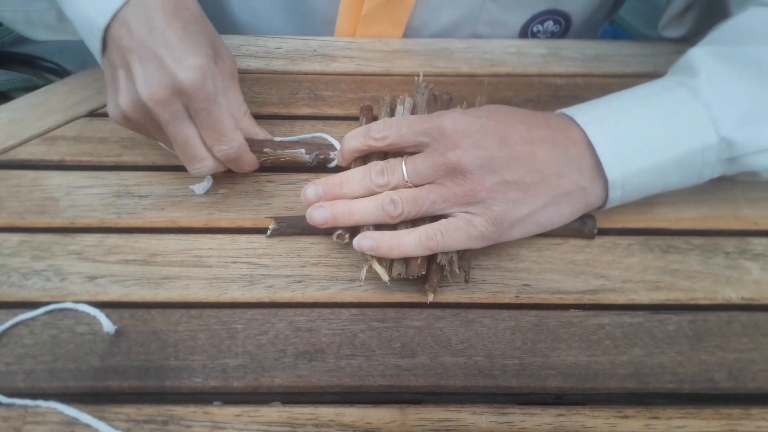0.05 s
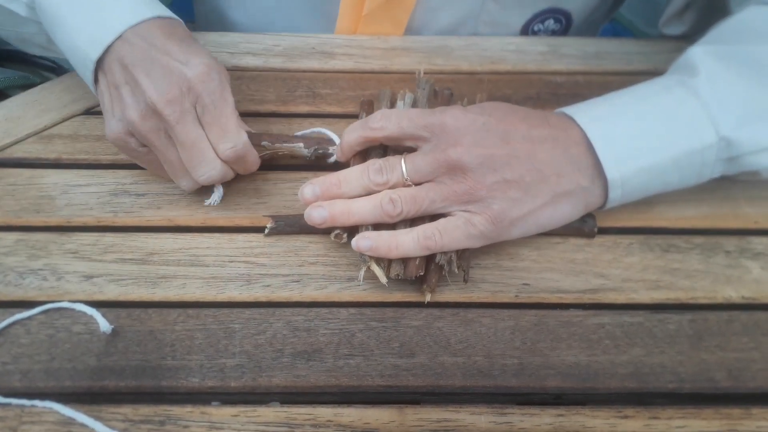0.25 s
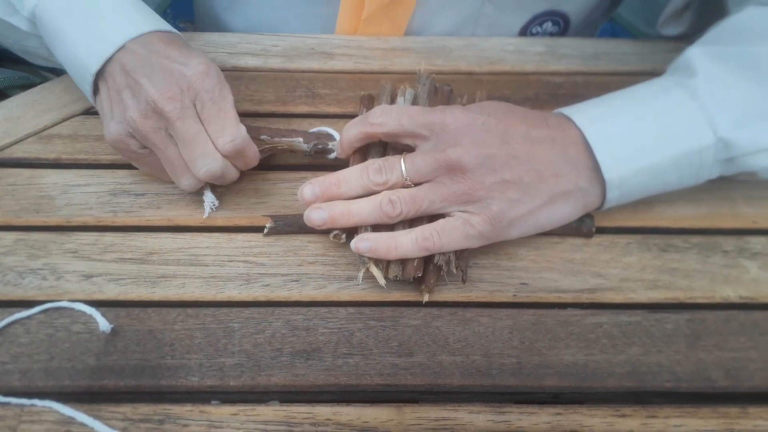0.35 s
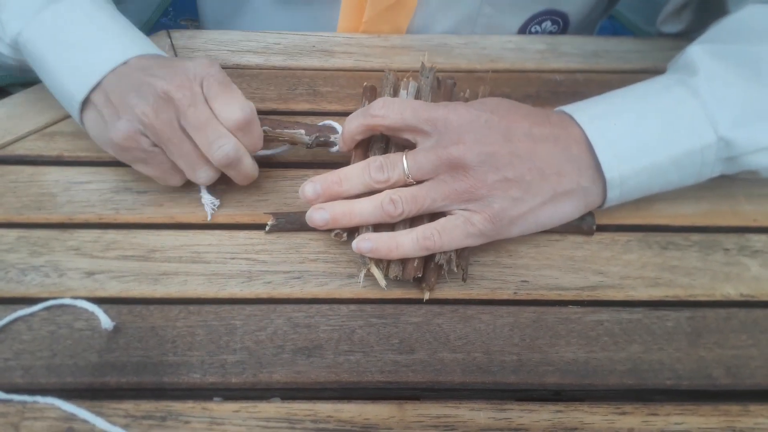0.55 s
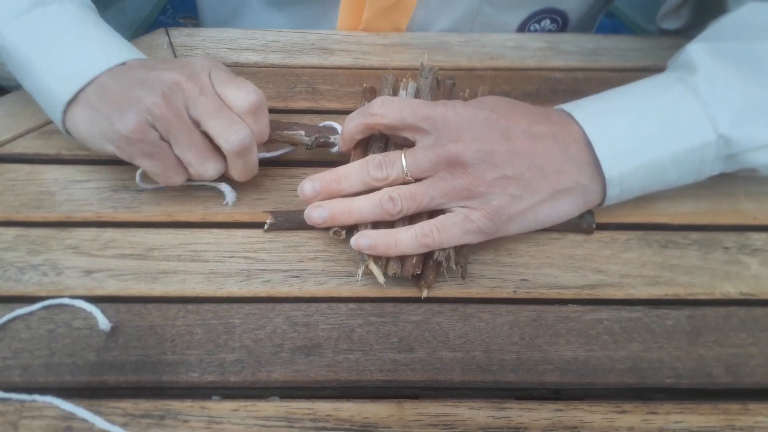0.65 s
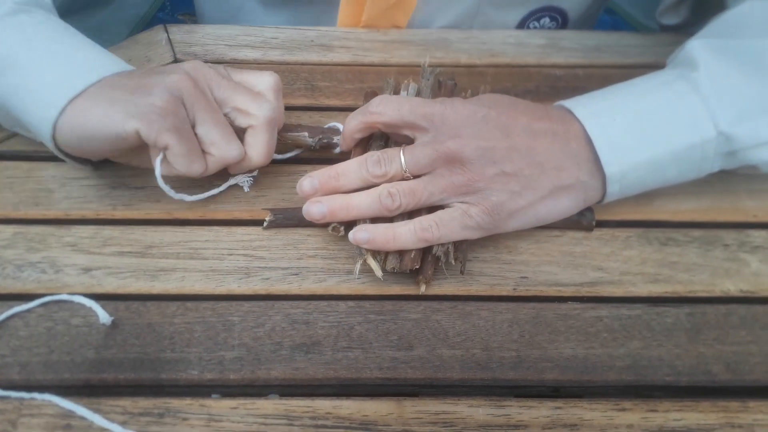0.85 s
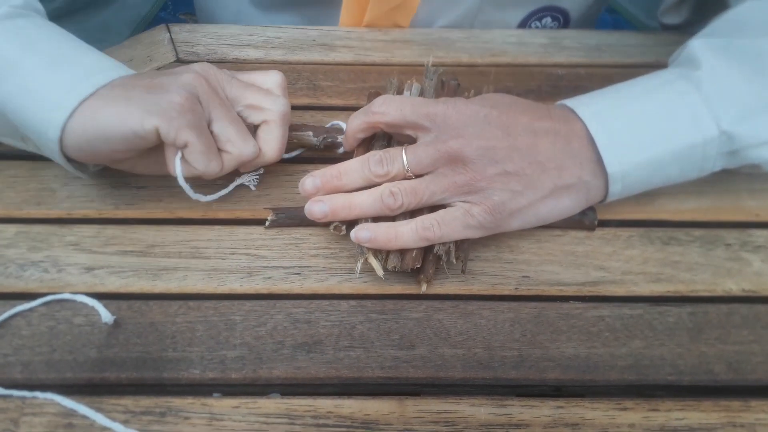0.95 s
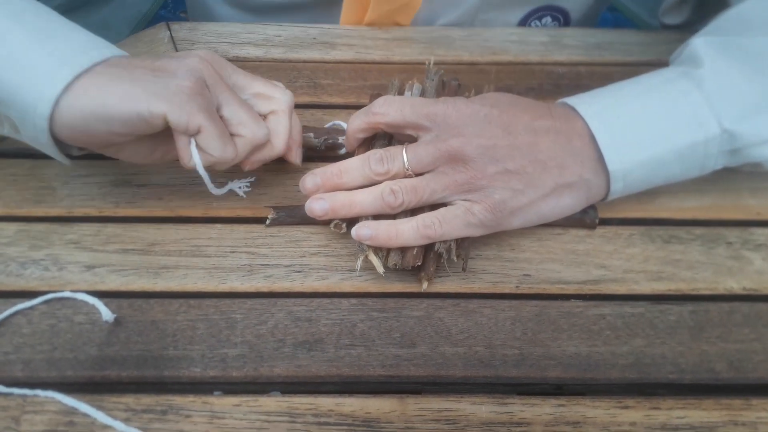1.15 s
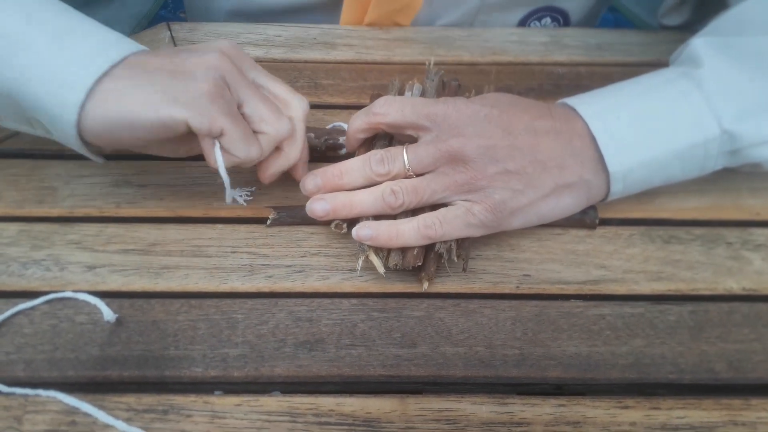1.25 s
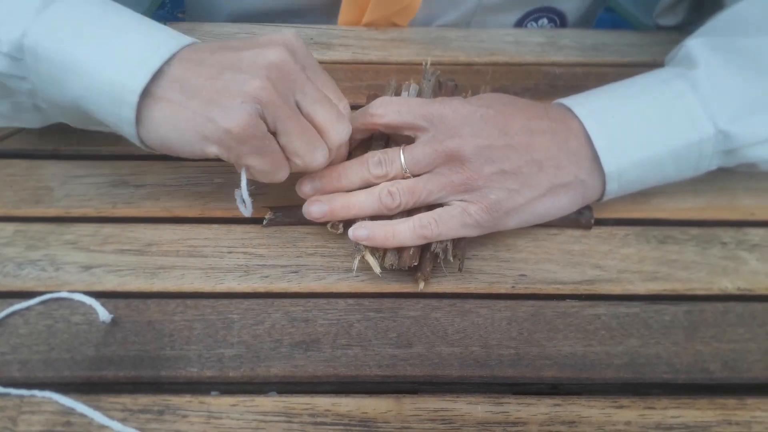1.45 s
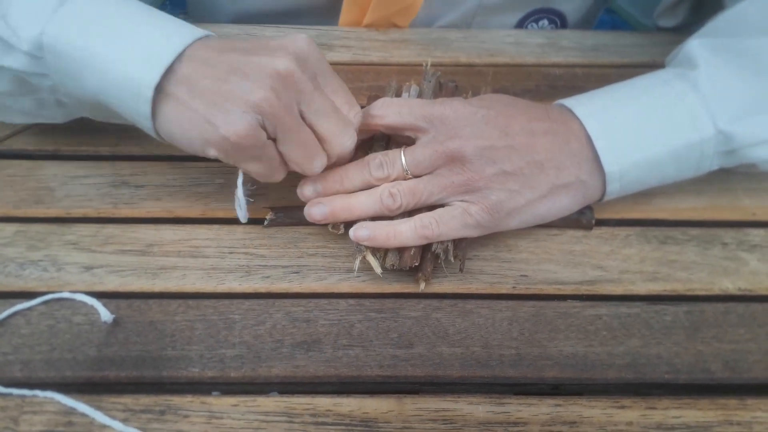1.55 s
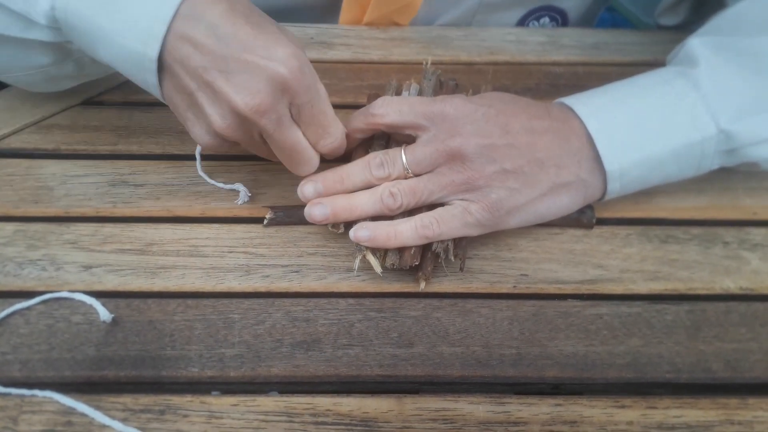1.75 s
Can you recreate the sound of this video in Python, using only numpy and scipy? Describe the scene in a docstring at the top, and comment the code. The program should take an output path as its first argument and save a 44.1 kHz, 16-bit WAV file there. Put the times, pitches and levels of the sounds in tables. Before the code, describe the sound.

A bundle of sticks shifts and bumps softly on a wooden table while string rasps over the bark. Two dry twigs snap, half a second apart. Close microphone outdoors, with a faint steady hiss and a distant high bird.

```python
"""Over a steady outdoor hiss, hands tie string around a bundle of sticks on a wooden garden table.
At 0.2 s a distant bird whistles very high as the string rasps over bark by stick-slip friction.
The bundle rocks, its soft impacts exciting the modes of the boards, and at 0.64 s a thin dry twig
fractures and rings. The heaviest bumps follow from 1.0 s, with a thicker twig snapping at 1.1 s.
One stick taps another at 1.4 s, and the bird calls again near 1.65 s."""
import sys
import numpy as np
from scipy import signal
from scipy.fft import rfft, irfft, next_fast_len
from scipy.io import wavfile
from scipy.ndimage import map_coordinates

SR = 44100
rng = np.random.default_rng(int(sys.argv[2]) if len(sys.argv) > 2 else 0)


def unload_audio(sound):
    """Save the sound as a 16-bit wav file, at the path given as the first command line argument."""
    columns = np.transpose(np.atleast_2d(sound))
    # keep every value between -1 and 1, then stretch to whole-number steps
    steps = np.round(np.clip(columns, -1, 1) * 32767)
    wavfile.write(sys.argv[1], SR, steps.astype(np.int16))


N = 79380


def amp(db):
    """Amplitude ratio of a level in decibels."""
    return 10 ** (np.asarray(db) / 20)


def unit(x):
    """Normalisation to rms 1."""
    return x / np.sqrt(np.mean(x ** 2) + 1e-20)


def filtered(x, response):
    """Linear filtering: the spectrum of x is multiplied by a frequency response."""
    size = next_fast_len(len(x) + 8192)
    return irfft(rfft(x, size) * response(np.fft.rfftfreq(size, 1 / SR)), size)[:len(x)]


def coloured(x, spectrum):
    """Spectral shaping by (frequency [Hz], level [dB]) points on a log axis, at rms 1."""
    f, db = np.transpose(spectrum)
    return unit(filtered(x, lambda hz: amp(np.interp(np.log(hz + 1), np.log(f), db))))


def noise(spectrum):
    """Gaussian noise of the given spectrum, at rms 1."""
    return coloured(rng.standard_normal(N), spectrum)


def add(track, start, sound):
    """Superposition of a sound on the track from a start time in seconds."""
    i = max(0, round(start * SR))
    track[i:i + len(sound)] += sound[:max(0, N - i)]


# Spectra of the outdoor hiss and rumble (frequency [Hz], relative level [dB])
HISS_SPECTRUM = [(290, -44), (500, -9), (946, -2.5), (1110, -6.5), (1400, -1.5), (1550, -3), (1930, -4),
                 (2360, -4), (3390, -3), (4530, 0), (6140, -6.5), (8960, -3.5), (11500, -11.5),
                 (15100, -13), (16000, -23)]
RUMBLE_SPECTRUM = [(20, -24), (60, 6), (150, -4.5), (380, -7.5), (600, -19), (1500, -29)]

def air(hiss_db=-52.2, rumble_db=-59.5):
    """Stationary broadband noise: a steady hiss over a faint rumble."""
    return amp(hiss_db) * noise(HISS_SPECTRUM) + amp(rumble_db) * noise(RUMBLE_SPECTRUM)


# Whistled notes (time [s], duration [s], start frequency [Hz], end frequency [Hz], level [dB])
BIRD_NOTES = [(.189, .024, 12430, 12350, -44.5), (.212, .026, 12450, 12580, -38),
              (.228, .03, 12570, 12565, -33.5), (.25, .032, 12450, 12570, -42),
              (1.17, .04, 12150, 12050, -62), (1.636, .026, 12020, 12130, -44),
              (1.66, .03, 12600, 12080, -42), (1.678, .026, 12130, 12100, -45)]

def bird(waver_hz=25, wavers_per_s=600, echo_db=-10, echo_t60=.19):
    """Frequency modulation: pure tones glide and waver, followed by diffuse reverberation."""
    song = np.zeros(N)
    for start, length, start_hz, end_hz, db in BIRD_NOTES:
        progress = np.linspace(0, 1, int(length * SR))
        waver = map_coordinates(rng.standard_normal(size=64), [progress * length * wavers_per_s])
        hz = start_hz + (end_hz - start_hz) * progress + waver_hz * waver
        add(song, start, amp(db) * np.sin(np.pi * progress) * np.sin(2 * np.pi * np.cumsum(hz) / SR))
    t = np.arange(SR // 3) / SR
    tail = rng.standard_normal(len(t)) * amp(-60 * t / echo_t60)
    return song + amp(echo_db) * signal.fftconvolve(song, tail / np.linalg.norm(tail))[:N]


# Envelope of hands and bundle shifting on the boards (time [s], level [dB])
SHUFFLE_ENVELOPE = [(0, -59), (.13, -48), (.21, -61), (.28, -51), (.37, -49), (.46, -48), (.54, -55),
                    (.65, -46), (.83, -49), (.98, -55), (1.06, -42), (1.14, -42), (1.29, -44), (1.38, -60),
                    (1.43, -45), (1.55, -55), (1.66, -57.5), (1.73, -66), (1.8, -57)]
# Spectrum of that rustle (frequency [Hz], relative level [dB])
SHUFFLE_SPECTRUM = [(20, -41), (45, -15), (75, 2), (130, -1.5), (220, -7), (380, -15.5), (550, -23),
                    (1000, -40), (3000, -94)]
# Hollow rubs of the bundle (centre time [s], half-width [s], level [dB], frequency [Hz])
HOLLOW_RUBS = [(.01, .025, -53, 370), (.255, .025, -57, 560), (1.09, .035, -42, 320),
               (1.44, .04, -46.5, 280), (1.785, .025, -57, 350)]

def shuffle(rub_octaves=.35):
    """Sliding friction on the table: a low rustle, with resonant bands of noise for the rubs."""
    t = np.arange(N) / SR
    times, levels = np.transpose(SHUFFLE_ENVELOPE)
    out = amp(np.interp(t, times, levels)) * noise(SHUFFLE_SPECTRUM)
    for centre, half, db, hz in HOLLOW_RUBS:
        resonance = lambda f: np.exp(-(np.log2((f + 1) / hz) / rub_octaves) ** 2 / 2)
        rub = unit(filtered(rng.standard_normal(N), resonance))
        out += amp(db) * np.exp(-((t - centre) / half) ** 2) * rub
    return out


# Modes of a tapped stick (frequency [Hz], relative level [dB], T60 [s])
STICK_MODES = [(1300, -6, .02), (1760, -1, .028), (1900, -5, .02), (2480, 0, .032), (3100, -7, .02)]
# Spectrum of its scuff (frequency [Hz], relative level [dB])
SCUFF_SPECTRUM = [(300, -12), (700, -12), (1600, 0), (2600, -2), (4000, -9), (8000, -28)]

def stick_tap(start=1.411, level_db=-42, rise_s=.0006, scuff_t60=.05):
    """Damped free vibration: stick touches stick, and the modes ring with a short scuff."""
    out, t = np.zeros(N), np.arange(SR // 8) / SR
    scuff = amp(-60 * t / scuff_t60) * noise(SCUFF_SPECTRUM)[:len(t)]
    ring = sum(amp(db - 60 * t / t60) * np.sin(2 * np.pi * hz * t) for hz, db, t60 in STICK_MODES)
    attack = 1 - np.exp(-t / rise_s)
    add(out, start, amp(level_db) * attack * (ring + scuff))
    return out


# Small ticks of bark (time [s], level [dB], frequency [Hz], T60 [s])
BARK_TICKS = [(.045, -47, 8000, .02), (.231, -43, 7000, .02), (.2605, -32, 10000, .016),
              (.268, -43, 9000, .015), (.962, -38, 7000, .014), (1.0245, -39.5, 9000, .012),
              (1.1145, -35, 10000, .022), (1.124, -41, 9000, .03), (1.759, -45.5, 3300, .012)]

def bark_ticks(width_octaves=.7):
    """Heavily damped resonance: bark catches and lets go in brief bursts of band noise."""
    out, t = np.zeros(N), np.arange(SR // 10) / SR
    for start, db, hz, t60 in BARK_TICKS:
        resonance = lambda f: 1 / (1 + (np.log2((f + 1) / hz) / width_octaves) ** 2)
        burst = unit(filtered(rng.standard_normal(len(t)), resonance))
        add(out, start, amp(db - 60 * t / t60) * burst)
    return out


# Rasps of the string and, at 0.36 s, a soft, broad swell of background hiss
# (centre time [s], half-width [s], hiss level [dB], body level [dB])
NOISE_SWELLS = [(.188, .024, -48.5, -62), (.255, .026, -44.3, -47.5), (.36, .08, -54, -56),
                (.6, .06, -54.5, -58), (.995, .03, -49.5, -59)]
# Spectra of their bright hiss and lower body (frequency [Hz], relative level [dB])
SWELL_HISS = [(1500, -18), (3500, -2), (6000, -4), (9000, 5.5), (12000, -5), (16000, -7)]
SWELL_BODY = [(100, -11), (400, 4), (900, -4.5), (2000, -7), (4000, -13), (9000, -41)]

def rasps_and_hiss(catches_per_s=1800, catch_share=.4):
    """Stick-slip friction: string fibres catch on bark; the same noise gives one soft swell of hiss."""
    t = np.arange(N) / SR
    catches = unit(rng.standard_normal(N) * (rng.random(N) < catches_per_s / SR))
    slip = np.sqrt(catch_share) * catches + np.sqrt(1 - catch_share) * rng.standard_normal(N)
    hiss, body = coloured(slip, SWELL_HISS), noise(SWELL_BODY)
    return sum(np.exp(-((t - centre) / half) ** 2) * (amp(hiss_db) * hiss + amp(body_db) * body)
               for centre, half, hiss_db, body_db in NOISE_SWELLS)


# Fracture of each twig (time [s], level [dB], tearing time [s], relative tearing level [dB])
THIN_FRACTURE = (.6366, -19.5, .0003, -6.5)
THICK_FRACTURE = (1.1051, -19, .0022, -2)
# Modes of each twig (frequency [Hz], relative level [dB], T60 [s])
THIN_MODES = [(3350, -10, .009), (3980, -6, .009), (4600, -13, .007), (8220, -12, .005), (9540, -9, .004),
              (11200, 0, .005), (12300, -0.5, .004), (13700, -12, .005), (15300, 1, .004)]
THICK_MODES = [(1660, -21, .012), (3500, -16, .007), (4170, -7, .008), (4700, -11, .005), (5250, -10, .007),
               (5860, -9, .008), (6800, -16, .006), (7690, -4, .009), (8370, 0, .01), (8950, 0, .008),
               (9400, -5, .007), (10650, -6, .007), (11850, -9, .006), (12500, 0, .009),
               (15050, -5.5, .006)]
# Spectra of the tearing fibres (frequency [Hz], relative level [dB])
THIN_SPECTRUM = [(150, -12), (500, 3), (900, -5), (2400, -9), (3700, 2), (5800, -6), (9000, 0), (12000, 0),
                 (16000, 0)]
THICK_SPECTRUM = [(200, -25), (900, -18), (2700, -15), (4200, -1), (6500, -3), (9500, 1), (12000, -1),
                  (16000, -7)]

def twig_snap(fracture, modes, spectrum, tear_t60=.008, splinter_db=-23, splinter_t60=.07):
    """Brittle fracture: the modes build while fibres tear, then decay under a faint crackle."""
    start, level_db, tear_s, tear_db = fracture
    out, t = np.zeros(N), np.arange(SR // 8) / SR
    since_break = np.maximum(t - tear_s, 0)
    swell = np.sqrt(np.minimum(t / tear_s, 1))
    ring = sum(amp(db - 60 * since_break / t60) * np.sin(2 * np.pi * (hz * t + rng.random()))
               for hz, db, t60 in modes)
    tearing = amp(tear_db - 60 * since_break / tear_t60)
    splinters = amp(splinter_db - 60 * t / splinter_t60)
    crackle = (tearing + splinters) * noise(spectrum)[:len(t)]
    add(out, start, amp(level_db) * swell * (ring + crackle))
    return out


# Soft contacts of the bundle (time [s], force level [dB], frequency [Hz], half-width [s])
SOFT_CONTACTS = [(.142, -38, 110, .008), (.347, -31, 105, .011), (.381, -28, 135, .0045),
                 (.438, -22, 115, .0058), (.463, -38, 100, .008), (.574, -35.5, 135, .008),
                 (.594, -34.5, 100, .009), (.64, -37, 110, .007), (.663, -33, 260, .0042),
                 (.672, -29.5, 115, .007), (.71, -34, 85, .006), (.729, -36, 140, .006),
                 (.746, -28, 112, .009), (.802, -31, 125, .007), (.82, -33.5, 130, .009),
                 (.848, -42, 95, .012), (.917, -36, 120, .005), (1.0243, -14.5, 185, .0035),
                 (1.0435, -16, 130, .0045), (1.073, -25, 135, .008), (1.086, -18, 145, .0065),
                 (1.123, -24, 175, .008), (1.16, -36, 100, .012), (1.186, -19.5, 170, .005),
                 (1.261, -28, 170, .0075), (1.279, -30, 240, .005), (1.288, -29, 115, .007),
                 (1.318, -39, 130, .018), (1.67, -42, 115, .011)]
# Spectrum of the contact roughness (frequency [Hz], relative level [dB])
GRIT_SPECTRUM = [(90, -16), (160, -1), (230, 0), (320, -5), (450, -19), (650, -30), (1200, -55)]
# Hard contacts of wood on wood (time [s], force level [dB], frequency [Hz])
HARD_CONTACTS = [(1.0235, -26.5, 440), (1.0415, -27.5, 400), (1.0855, -27, 360), (1.1215, -35, 380),
                 (1.184, -27, 330), (1.265, -39, 340)]
# Modes of the table boards (frequency [Hz], gain [dB], T60 [s])
BOARD_MODES = [(125, -18, .06), (404, -15, .04), (455, -19, .05)]

def bundle_bumps(grit_db=-19, knock_half_s=.0019, direct_db=-1.5, low_cut_hz=25):
    """Forced vibration: gritty pushes and short knocks drive boards that radiate little deep bass."""
    t = np.arange(N) / SR
    grit = amp(grit_db) * noise(GRIT_SPECTRUM)
    force = np.zeros(N)
    for centre, db, hz, half in SOFT_CONTACTS:
        lag = t - centre
        rise_s, fall_s = .42 * half, .68 * half
        swell = 2 * np.exp(-np.logaddexp(-lag / rise_s, lag / fall_s))
        force += amp(db) * swell * (np.cos(2 * np.pi * hz * lag) + grit)
    for centre, db, hz in HARD_CONTACTS:
        lag = t - centre
        force += amp(db) * np.exp(-(lag / knock_half_s) ** 2) * np.sin(2 * np.pi * hz * lag)

    def boards(f):
        """Modal summation: the direct push plus each resonance, through a first-order high-pass."""
        response = amp(direct_db)
        for hz, db, t60 in BOARD_MODES:
            bandwidth_hz = np.log(1000) / (np.pi * t60)
            damping = 1j * f * bandwidth_hz
            response = response + amp(db) * damping / (hz * hz - f * f + damping)
        return response * 1j * f / (low_cut_hz + 1j * f)

    return filtered(force, boards)


def scene():
    """Linear superposition of all sources at one microphone close to the bundle."""
    thin_twig = twig_snap(THIN_FRACTURE, THIN_MODES, THIN_SPECTRUM)
    thick_twig = twig_snap(THICK_FRACTURE, THICK_MODES, THICK_SPECTRUM)
    wood = bundle_bumps() + shuffle() + thin_twig + thick_twig + bark_ticks() + stick_tap()
    return (wood + rasps_and_hiss() + bird() + air())[None]


def record(dry):
    """Band limiting: a steep low-pass removes the highest treble."""
    cutoff_hz = 16000
    return filtered(dry[0], lambda hz: 1 / np.sqrt(1 + (hz / cutoff_hz) ** 120))[None]


dry = scene()
out = record(dry)
unload_audio(out)
```